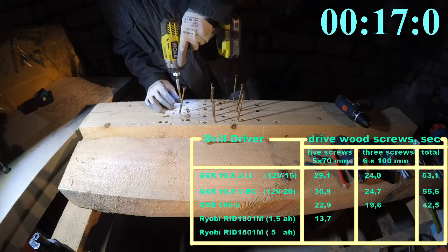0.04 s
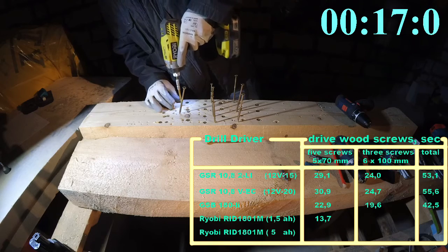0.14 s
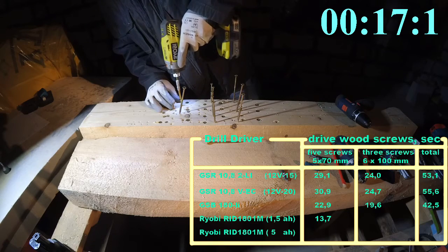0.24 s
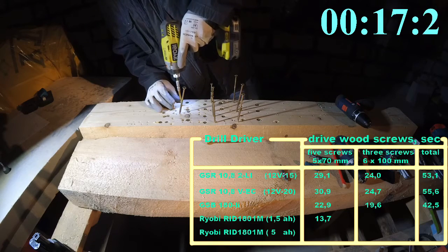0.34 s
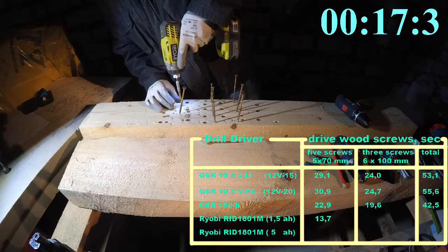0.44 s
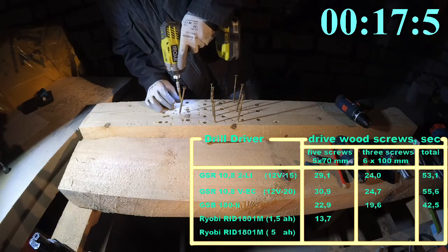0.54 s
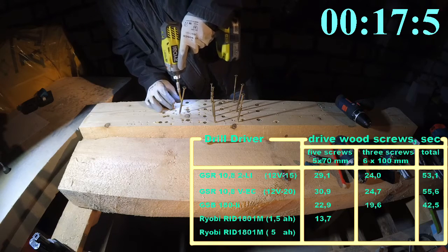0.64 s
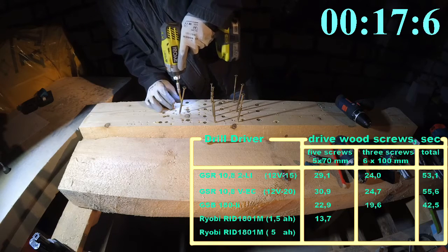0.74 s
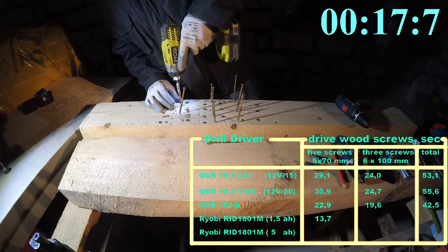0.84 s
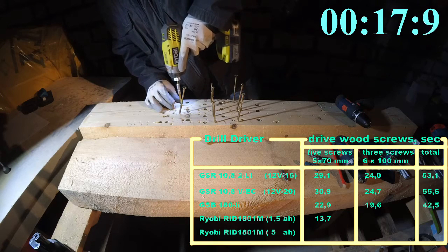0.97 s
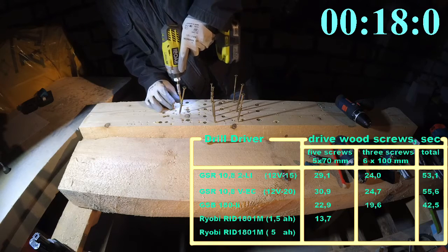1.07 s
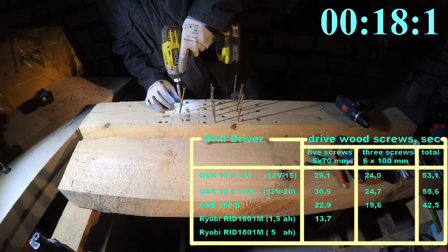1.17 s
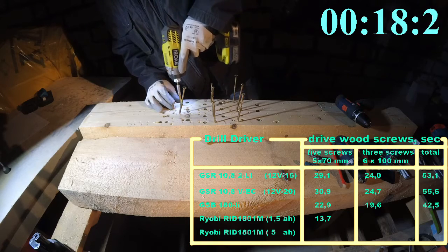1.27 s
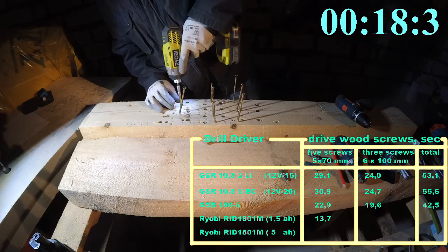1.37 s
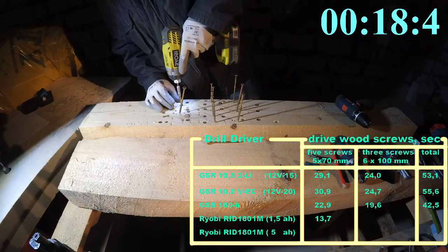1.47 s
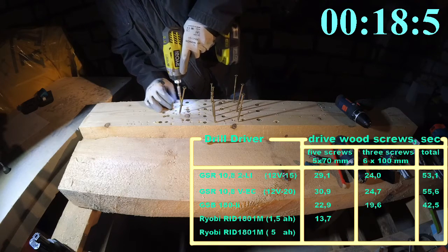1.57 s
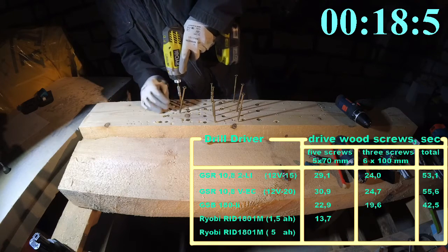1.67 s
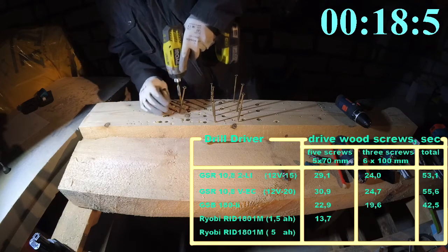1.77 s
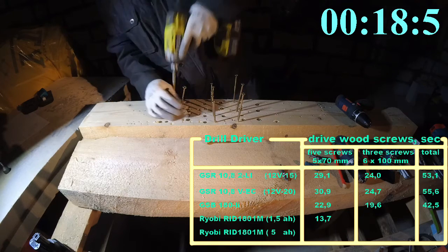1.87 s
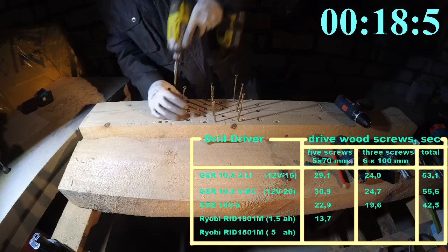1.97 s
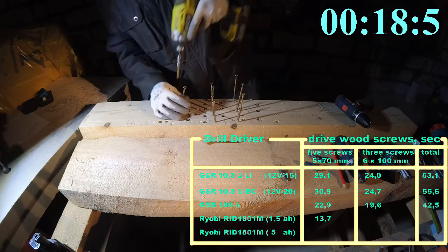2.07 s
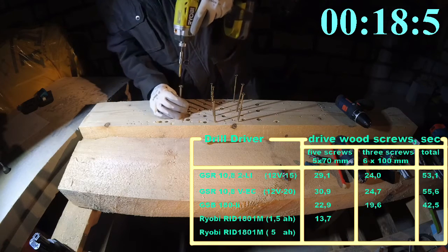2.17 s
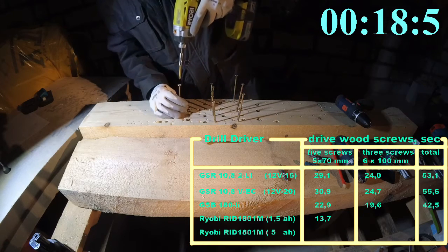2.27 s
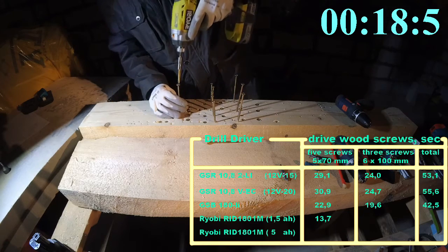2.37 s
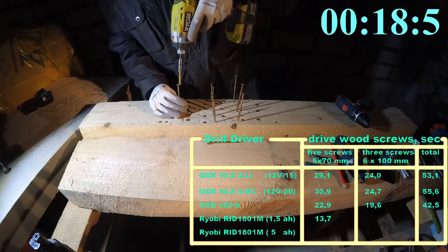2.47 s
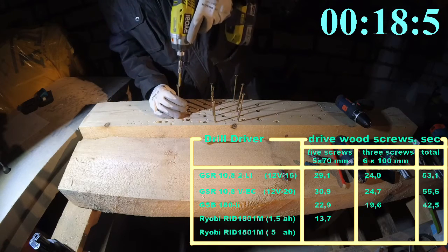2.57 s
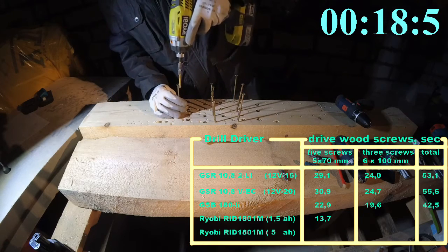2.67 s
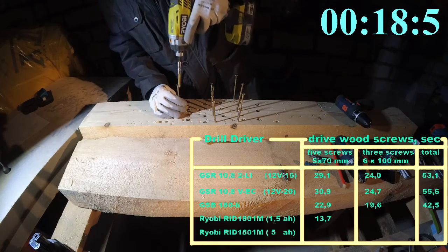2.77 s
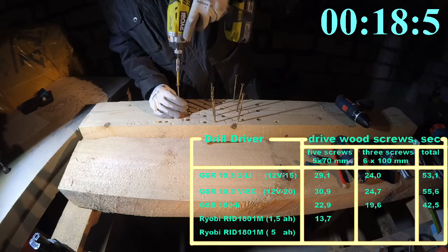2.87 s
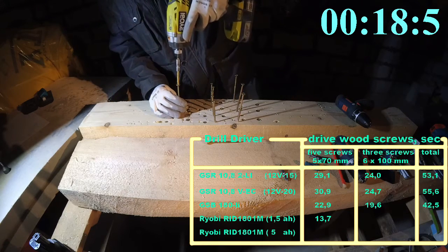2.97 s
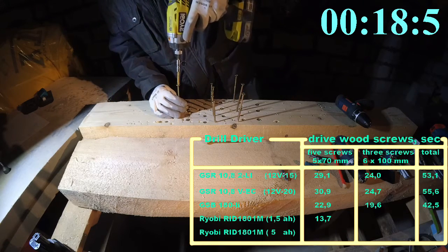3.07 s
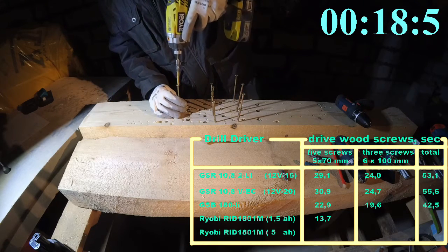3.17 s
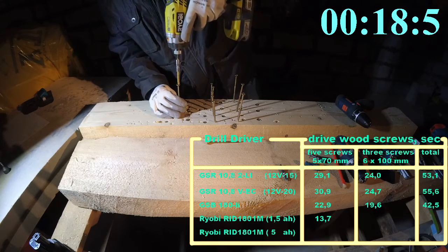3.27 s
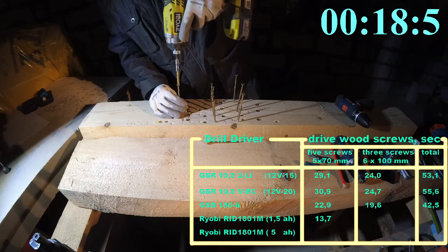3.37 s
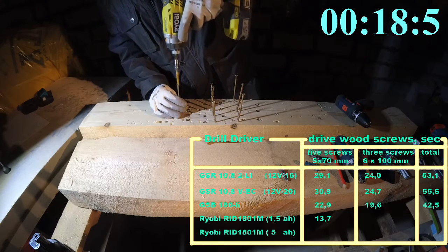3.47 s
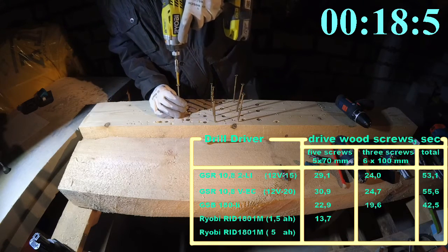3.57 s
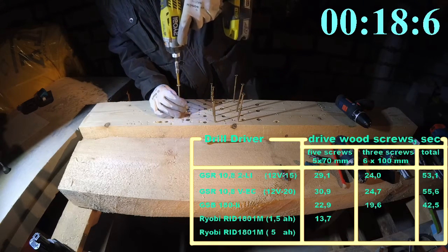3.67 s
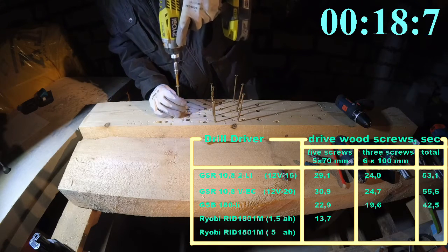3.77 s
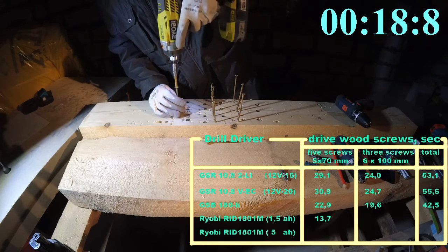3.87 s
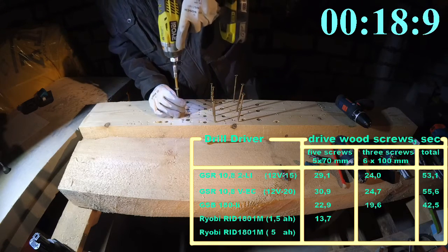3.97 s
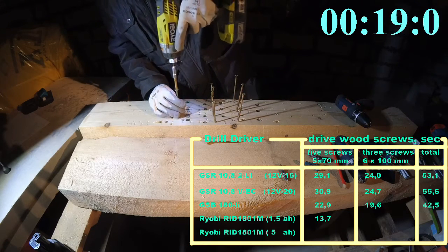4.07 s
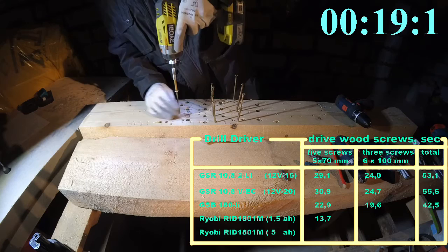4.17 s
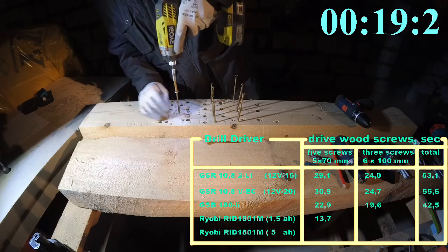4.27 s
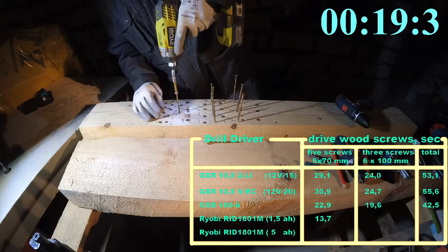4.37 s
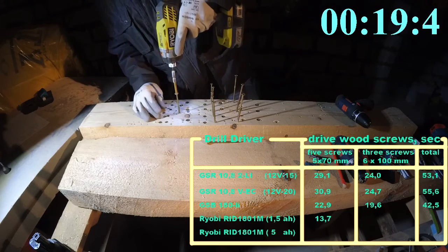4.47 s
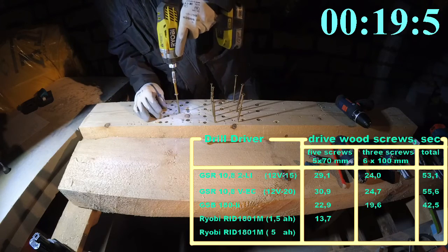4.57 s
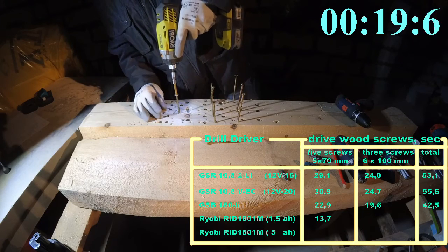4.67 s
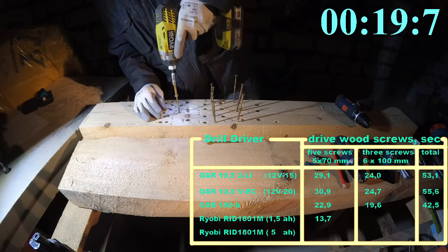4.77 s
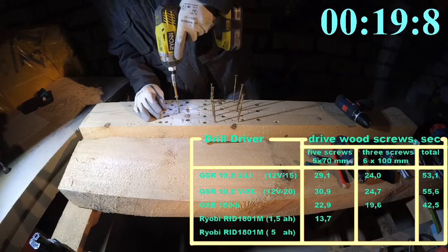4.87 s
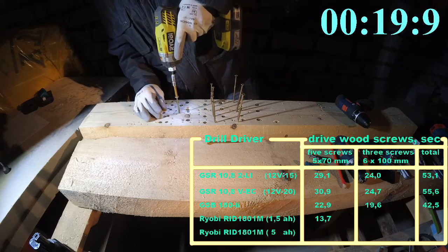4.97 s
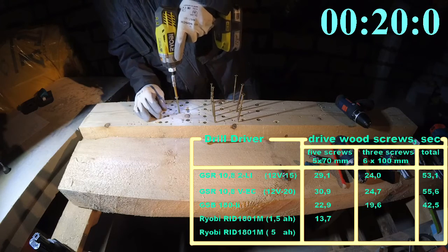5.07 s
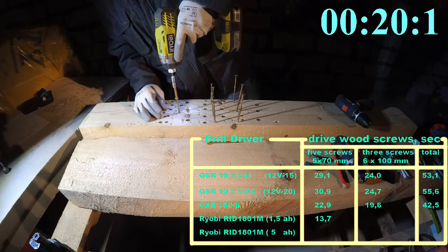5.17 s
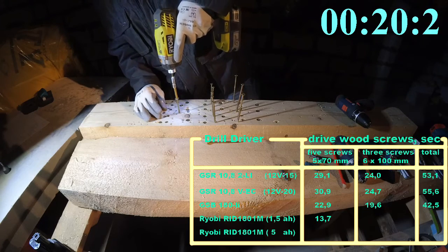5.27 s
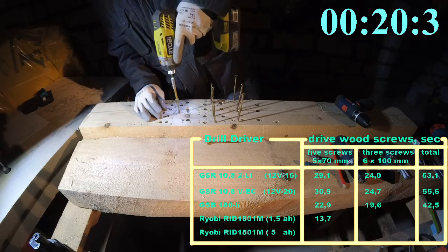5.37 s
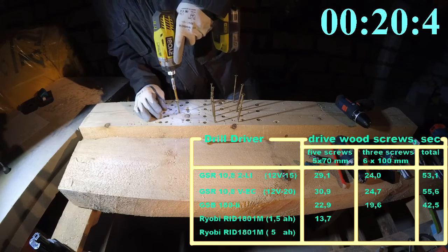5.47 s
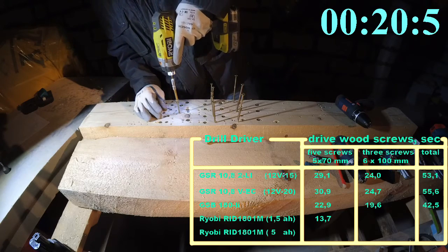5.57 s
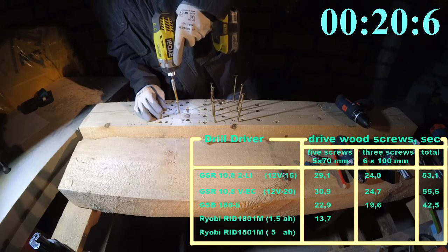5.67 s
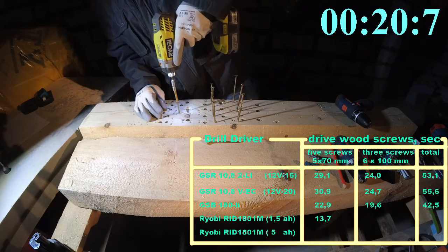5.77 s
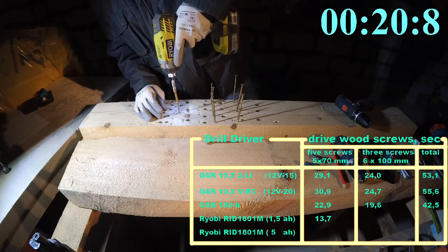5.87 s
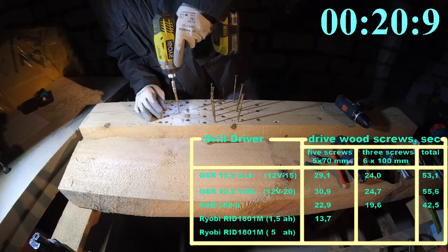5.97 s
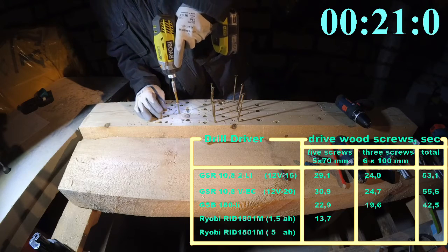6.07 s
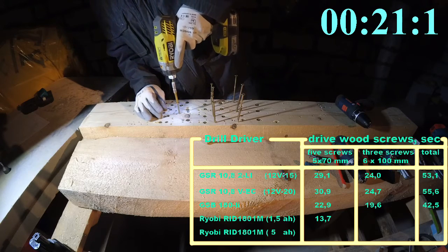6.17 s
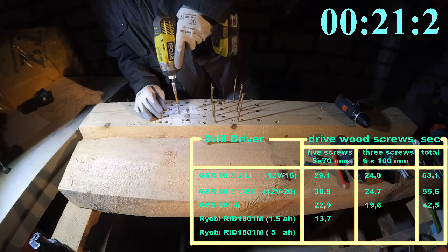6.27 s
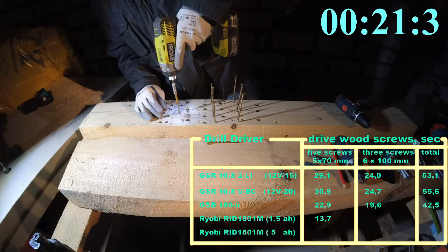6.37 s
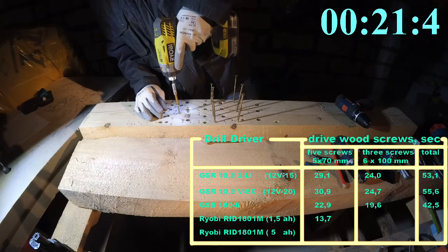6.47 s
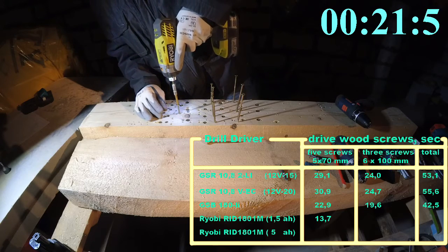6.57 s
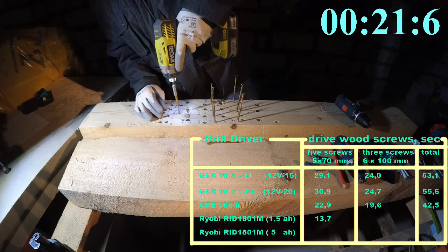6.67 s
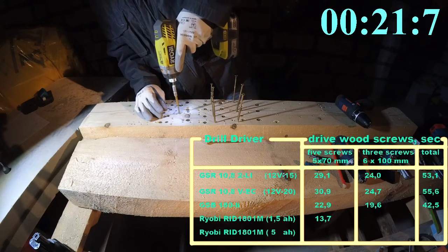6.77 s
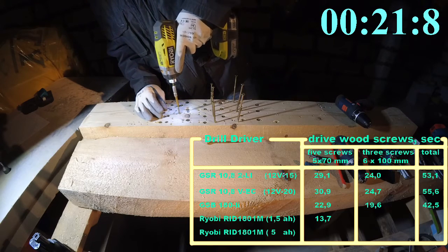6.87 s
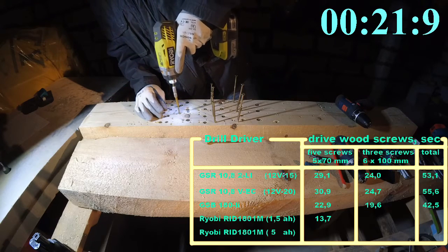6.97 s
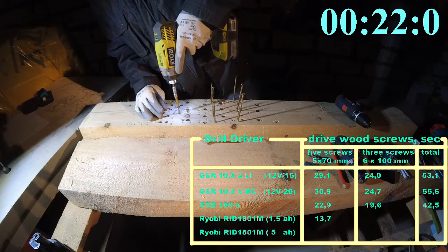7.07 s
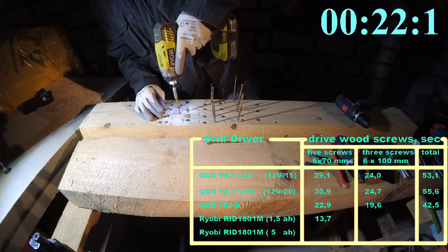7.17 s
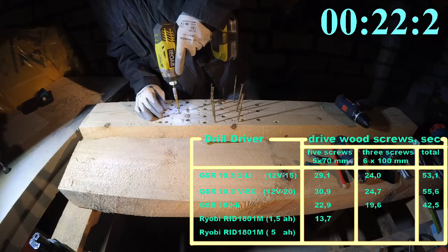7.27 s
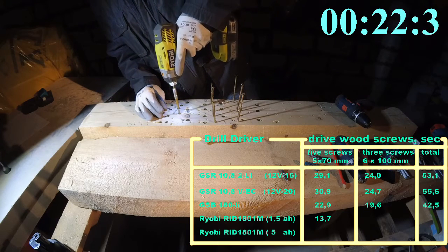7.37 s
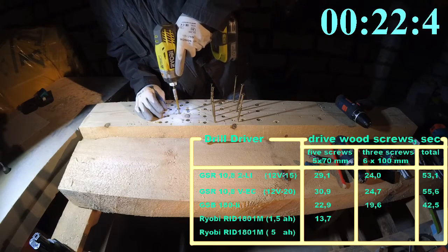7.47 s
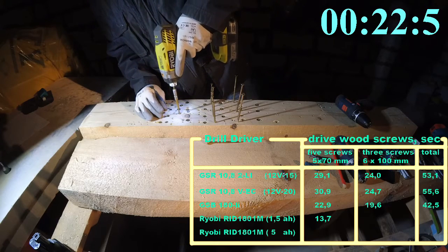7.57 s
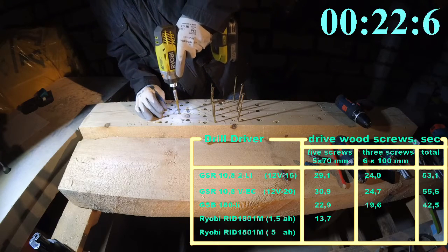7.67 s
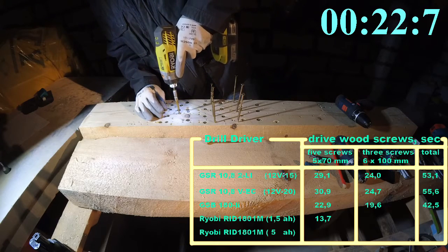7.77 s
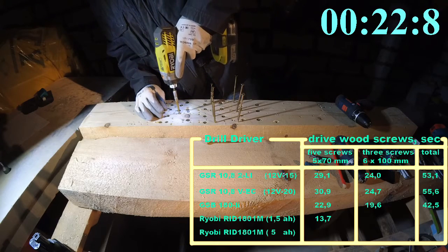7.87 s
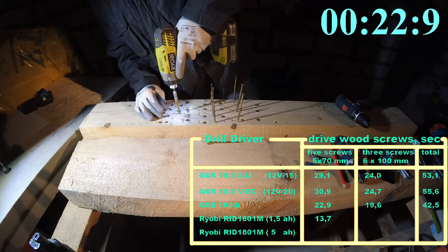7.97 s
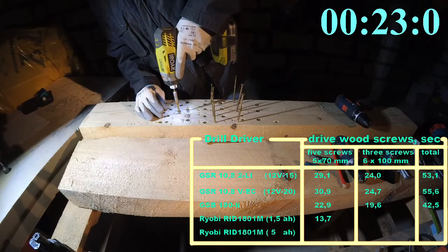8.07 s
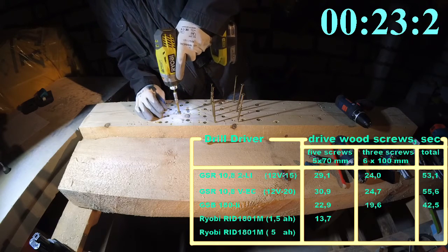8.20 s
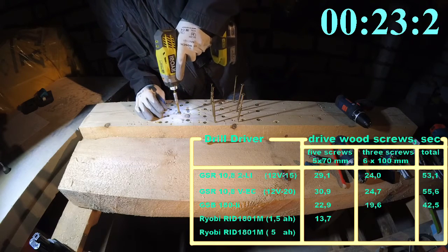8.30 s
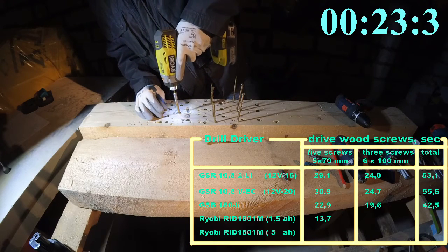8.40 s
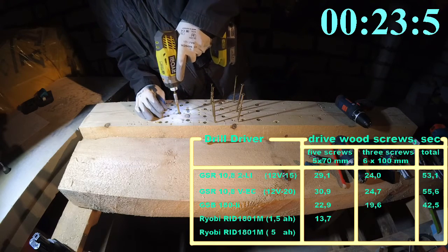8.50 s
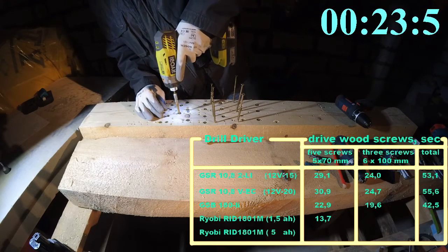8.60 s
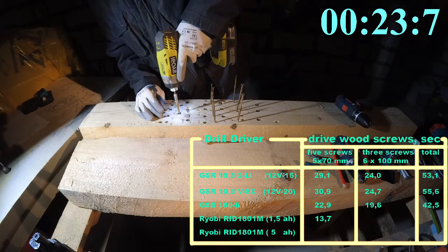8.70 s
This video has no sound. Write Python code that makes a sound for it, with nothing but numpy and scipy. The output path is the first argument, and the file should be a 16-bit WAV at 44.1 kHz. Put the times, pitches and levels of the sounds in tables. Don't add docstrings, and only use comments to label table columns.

```python
import sys
import numpy as np
from scipy import signal
from scipy.fft import rfft, irfft, next_fast_len
from scipy.io import wavfile

SR = 44100
rng = np.random.default_rng(int(sys.argv[2]) if len(sys.argv) > 2 else 0)


def gain_from_db(level_db):
    decades = np.asarray(level_db, float) / 20
    return 10 ** decades


def generate_wav(signal):
    frames = np.transpose(np.atleast_2d(signal))
    scaled = np.clip(frames, -1, 1) * 32767
    pcm = np.round(scaled).astype(np.int16)
    wavfile.write(sys.argv[1], SR, pcm)


N = 385434
T = np.arange(N) / SR


def unit(x):
    return x / np.sqrt(np.mean(x ** 2))


def noise():
    return rng.standard_normal(N)


def wobble(rate_hz):
    return unit(ring(noise(), rate_hz, 2 * rate_hz))


def curve(tables, column, quiet=-120):
    out = np.full(N, 1. * quiet)
    for rows in tables:
        rows = np.array(rows)
        inside = (T >= rows[0, 0]) & (T <= rows[-1, 0] + 1e-3)
        out[inside] = np.interp(T[inside], rows[:, 0], rows[:, column])
    return out


def colour(x, points):
    hz, db = np.transpose(points)
    size = next_fast_len(len(x))
    log_hz = np.log(np.arange(size // 2 + 1) * SR / size + 1)
    gain = gain_from_db(np.interp(log_hz, np.log(hz), db, left=-70))
    return irfft(rfft(x, size) * gain, size)[:len(x)]


def ring(x, hz, width_hz):
    return signal.lfilter(*signal.iirpeak(hz, hz / width_hz, SR), x)


def body(x, modes):
    return sum((-1) ** k * gain_from_db(db) * ring(x, hz, width) for k, (hz, width, db) in enumerate(modes))


def lift(x, modes):
    return x + sum(gain_from_db(db) * ring(x, hz, width) for hz, width, db in modes)


def tone(hz, db):
    return np.sqrt(2) * gain_from_db(db) * np.sin(2 * np.pi * np.cumsum(hz) / SR)


def spikes(s, size):
    return np.bincount(np.clip(s * SR, 0, N - 1).astype(int), size, N)


def burst(x, length_s):
    t = np.arange(int(6 * length_s * SR) + 2) / SR / length_s
    return signal.oaconvolve(x, t * np.exp(1 - t))[:N]


def crack_shape(x, length_s):
    t = np.arange(int(3 * length_s * SR) + 2) / SR / length_s
    return signal.oaconvolve(x, np.exp(-t ** 2))[:N]


# pitch_hz, level_db
HUM_COLOUR = [(65, -48), (110, 7.5), (192, 6.5), (358, -2), (553, -1), (909, -1), (1320, -4.5),
              (2260, -16.5), (3560, -25.5), (13100, -28), (14600, -36), (15500, -58)]
# start_s, end_s
PAUSE_S = (1.5, 3.8)


def shop():
    hum = unit(colour(noise() * gain_from_db(1.7 * wobble(5)), HUM_COLOUR)) * gain_from_db(-47)
    ramp_s = .15
    pause = np.clip(np.minimum(T - PAUSE_S[0], PAUSE_S[1] - T) / ramp_s, 0, 1)
    rumble = unit(ring(ring(noise(), 15, 36), 24, 74))
    return hum + rumble * gain_from_db(-41 + 5.5 * pause)


# pitch_hz, decay_s (time to fall 60 dB)
ROOM_DECAY = [(200, 0.69), (800, 0.78), (3000, 0.38), (9000, 0.18)]


def room(x):
    t = np.arange(SR) / SR
    tail = sum(ring(rng.standard_normal(SR), hz, 1.7 * hz) * 1000. ** (-t / t60) for hz, t60 in ROOM_DECAY)
    tail = tail * np.clip((t - .004) / .0021, 0, 1)
    return signal.oaconvolve(x, tail / np.sqrt(np.sum(tail ** 2)))[:N]


# start_s, held_s, level_db
SCRAPES = [(1.95, 0.43, -61), (2.505, 0.069, -51.5), (2.79, 0.067, -57), (2.995, 0.032, -48.5),
           (3.262, .02, -66), (3.312, 0.056, -49), (3.49, .04, -61), (3.538, 0.0063, -45.5),
           (3.594, .015, -50.5)]


def scraping():
    attack_s, fade_db_per_s = .006, 350
    level = 0
    for s, held, db in SCRAPES:
        fade_db = fade_db_per_s * np.clip(T - s - held, 0, 1)
        level = level + np.clip((T - s) / attack_s, 0, 1) * gain_from_db(db - fade_db)
    grains = noise() * gain_from_db(4 * wobble(120))
    return unit(ring(ring(grains, 3500, 4500), 3800, 7000)) * level


# start_s, peak_db, pitch_hz, knock_db (in the beam)
CLICKS = [(2.155, -42.5, 9040, -58), (2.208, -38, 11100, -52), (2.3494, -37.5, 2060, -54.5),
          (2.508, -27.5, 1970, -43), (2.5334, -21, 6130, -40), (2.5425, -21.5, 5800, -42.5),
          (2.5458, -18.5, 4020, -40), (2.803, -38.5, 1800, -51), (2.8345, -35, 2470, -52),
          (2.884, -40.5, 3070, -59.5), (2.993, -26.5, 3010, -45), (3.017, -27.5, 1890, -37),
          (3.312, -27.5, 2820, -50), (3.324, -28, 2210, -48), (3.332, -22, 2870, -40),
          (3.3557, -29, 1900, -42), (3.374, -25.5, 1890, -39), (3.495, -32.5, 2090, -55),
          (3.540, -19, 2190, -42), (3.5744, -41, 7700, -57), (3.62, -17.5, 5320, -41),
          (3.645, -23, 3830, -41.5), (3.666, -12.5, 5800, -37)]
# pitch_hz, width_hz, level_db
KNOCK_MODES = [(560, 110, -18), (844, 34, -2.5), (1290, 93, -11.5), (1900, 140, -9)]


def clicks():
    out, knock = np.zeros(N), np.zeros(N)
    t = np.arange(2048) / SR
    fade = np.exp(-t / .0022) * (1 + .82 * np.exp(-t / .00065))
    for s, db, hz, knock_db in CLICKS:
        puff = rng.standard_normal(len(t)) * fade
        click = .25 * ring(puff, 5200, 7500) + 1.3 * ring(puff, hz, .13 * hz)
        at = int(s * SR)
        out[at:at + len(t)] += gain_from_db(db) * click
        knock[at:at + len(t)] += gain_from_db(knock_db + 33) * puff
    return out + body(knock, KNOCK_MODES)


# start_s, level_db
SPIN = [(3.617, -64), (3.621, -37), (3.645, -32), (3.664, -25), (3.78, -26.5), (3.89, -31.5), (3.91, -22),
        (3.95, -40)]
# pitch_hz, level_db (per Hz)
SPIN_COLOUR = [(88, -46.5), (150, -6.5), (186, -23.5), (462, -28.5), (827, -13.5), (1170, -20.5),
               (2060, -14), (2270, -16.5), (2650, -15), (4560, -10.5), (15500, -20.5)]
# start_s, pitch_hz, level_db, octave_db
WHINE = [(3.74, 2216, -49, -39), (3.758, 2413, -36, -38), (3.77, 2451, -38.5, -46),
         (3.814, 2280, -36.5, -30.5), (3.85, 2180, -26, -31.5), (3.91, 2250, -40.5, -34)]
# start_s, pitch_hz, level_db
SWITCH = [(3.592, 7700, -68), (3.596, 7630, -58), (3.609, 7600, -53), (3.612, 7340, -43.5),
          (3.635, 7130, -52), (3.65, 7400, -68.5)]


def motor():
    teeth = colour(noise() * gain_from_db(2.2 * wobble(150)), SPIN_COLOUR)
    gear_modes = [(1340, 110, -2), (3680, 120, 0), (4080, 45, 2), (5120, 33, -1.5)]  # pitch_hz, width_hz, level_db
    hiss = unit(lift(teeth, gear_modes)) * gain_from_db(curve([SPIN], column=1))
    hz = curve([WHINE], column=1, quiet=1900) * (1 + .003 * wobble(50))
    whine = tone(hz, curve([WHINE], column=2) + 2 * wobble(40))
    octave = tone(2 * hz, curve([WHINE], column=3))
    switch_db = curve([SWITCH], column=2) + 2.5 * wobble(200)
    return hiss + whine + octave + tone(curve([SWITCH], column=1, quiet=7000), switch_db)


# start_s, pitch_hz, level_db
SQUEAL = [
    [(0, 4130, -33), (.8, 4105, -32), (1.62, 4150, -33)],
    [(3.9, 4300, -33), (3.925, 4290, -24), (3.97, 4580, -31), (4.14, 4360, -22), (4.6, 4120, -27),
     (4.7, 4110, -33), (4.9, 4115, -25), (6.3, 4100, -26), (8.74, 3990, -33)],
]
# start_s, end_s
CUTTING_S = (3.9, 4.65)


def squeal(blow_s):
    cutting = (T > CUTTING_S[0]) & (T < CUTTING_S[1])
    creep = burst(spikes(blow_s + .0085, np.ones(len(blow_s))), .0022) + .5 * cutting
    hz = curve(SQUEAL, column=1, quiet=4000) * (1 + .004 * wobble(60))
    level_db = curve(SQUEAL, column=2) - 2 * cutting + 1.6 * wobble(20)
    return unit(creep) * tone(hz, level_db)


FIRST_BLOW_S = (.002, 3.9125)
# blow_number, gap_ms (to the next blow)
PACE = [
    [(0, 19.901), (15, 19.765), (35, 19.885), (58, 19.723), (70, 19.116), (82, 18.345)],
    [(0, 27.722), (1, 30.677), (5, 21.684), (30, 20.053), (42, 20.653), (75, 19.984), (150, 19.775),
     (215, 19.407), (240, 18.095)],
]
# start_s, level_db
LAST_BLOWS = [(1.635, 2), (1.6636, 2), (1.7001, 5), (1.721, 4)]


def blow_times():
    steady = []
    for start, rows in zip(FIRST_BLOW_S, PACE):
        gaps = np.interp(np.arange(rows[-1][0]), *np.transpose(rows)) / 1000
        steady.append(start + np.append(0, np.cumsum(gaps)))
    last_s, last_db = np.transpose(LAST_BLOWS)
    s = np.concatenate([steady[0], last_s, steady[1]])
    return s, np.concatenate([0 * steady[0], last_db, 0 * steady[1]])


# delay_s, length_s, level_db, pitch_hz
RATTLE = [(.0056, .0012, -8, 4000), (.0082, .0022, -7, 4200), (.0111, .0019, 0, 3300),
          (.0152, .0012, -10, 4200)]


def rattle(blow_s, loose_db):
    out = 0
    for delay, length, db, hz in RATTLE:
        late, strong = rng.standard_normal((2, len(blow_s)))
        hits = spikes(blow_s + delay + .0005 * late, gain_from_db(loose_db + db + 1.8 * strong))
        out = out + ring(crack_shape(hits, length) * noise(), hz, 1.5 * hz)
    return unit(out)


def hammer():
    s, strength_db = blow_times()
    loose_db = -1300 * np.clip(np.diff(s, append=s[-1]) - .0208, 0, .012)
    late, strong = rng.standard_normal((2, len(s)))
    push = burst(spikes(s + .00012 * late, gain_from_db(1.5 * strong)), .00012)
    s = s + .00037 * late
    blows = spikes(s, gain_from_db(strength_db + 1.6 * strong))
    anvil = ring(crack_shape(blows, .0025) * noise(), 9000, 11000)
    delayed = np.roll(blows, int(.0014 * SR))
    shank = ring(crack_shape(delayed, .003) * noise(), 2200, 2600)
    crack = unit(anvil + gain_from_db(-4.5) * shank)
    whirr = gain_from_db(-.5) * noise()
    return crack + gain_from_db(-5.5) * rattle(s, loose_db) + whirr, push, s


# start_s, force_db (of the blows), grip_db (of the thread in the beam)
DRIVE = [
    [(0, -14, 7), (.25, -13.5, 3.5), (.6, -15, 5), (1.25, -14, 3), (1.5, -13, 4.5), (1.666, -11.5, 5.5),
     (1.72, -23, 12), (1.83, -41, 9)],
    [(3.9, -22.5, 10), (3.94, -17, -8.5), (4.11, -13.5, -2.5), (4.6, -12.5, 0), (5.9, -12.5, -2),
     (6.7, -13, 5), (7.6, -13.5, 6.5), (8.4, -13.5, 4.5), (8.74, -12.5, 5)],
]


def force_and_grip():
    return curve(DRIVE, column=1), curve(DRIVE, column=2, quiet=0)


# pitch_hz, width_hz, level_db
BEAM_RING = [(769, 12, -5.5), (894, 15, -2), (1079, 34, -9.5), (1110, 57, -7), (1323, 140, -5.5),
             (1546, 200, -16.5)]
# pitch_hz, width_hz
BEAM_NOTE = (836, 14)
# pitch_hz, width_hz, level_db
BEAM_THUD = [(52, 45, -13), (99, 10, -3), (156, 6, 3), (201, 10, -5), (258, 14, -4), (291, 6, 4),
             (327, 6, 2), (351, 13, 4.5), (385, 6, 2), (401, 8, 1), (466, 8, 4), (495, 12, -2),
             (560, 60, -6), (680, 60, -6)]
# pitch_hz, width_hz, level_db
FIRST_SEAT = [(453, 10, 9), (1310, 90, -1)]


def timber(rough, push):
    force_db, grip_db = force_and_grip()
    ringing = body((.21 * unit(push) + rough) * gain_from_db(force_db + .5 + 1.3 * grip_db), BEAM_RING)
    note = ring(rough * gain_from_db(force_db + 14 + .76 * grip_db), *BEAM_NOTE)
    grind = unit(ring(ring(rough, 400, 360), 280, 440))
    thud = unit(unit(body(push, BEAM_THUD)) + .65 * grind)
    thud = thud * gain_from_db(force_db - 16.5 + .15 * grip_db)
    beam = np.roll(ringing + note + thud, int(.0028 * SR))
    return np.where(T < PAUSE_S[1] - .5, lift(beam, FIRST_SEAT), beam)


# pitch_hz, level_db (per Hz)
CRACK_COLOUR = [(530, -10), (900, -6), (1540, -5), (1930, -3), (2360, -6), (2890, -4.5), (4600, -4.5),
                (7680, -3.5), (9800, -5.5), (12500, -12), (15500, -14.5)]
# pitch_hz, width_hz, level_db (against the broad crack)
STEEL_MODES = [
    [(2050, 300, -10), (2960, 120, -6), (3250, 220, -2), (3760, 260, 2), (4090, 180, 1), (4920, 200, -9),
     (7500, 400, -14)],
    [(1890, 90, -2), (1990, 70, -4), (2115, 60, -5), (2560, 150, -7), (2850, 110, -1), (2965, 70, -1),
     (3200, 260, -3), (3750, 250, -5), (4110, 200, -2), (5060, 140, -9), (6230, 150, -9), (7600, 300, -9)],
]


def steel(rough):
    broad = colour(rough, CRACK_COLOUR)
    first_screw = T < FIRST_BLOW_S[1] - .5
    ringing = np.where(first_screw, lift(broad, STEEL_MODES[0]), lift(broad, STEEL_MODES[1]))
    return unit(ringing) * gain_from_db(force_and_grip()[0])


def scene():
    rough, push, blow_s = hammer()
    beam = timber(rough, push)
    near = steel(rough) + squeal(blow_s) + motor() + clicks() + scraping()
    mix = gain_from_db(1.5) * near + beam + gain_from_db(-12.5) * room(near + .6 * beam) + shop()
    return np.tile(mix, (2, 1))


def band_limit(x):
    return signal.sosfilt(signal.butter(12, 15750, fs=SR, output="sos"), x)


# start_s, gain_db
CAMERA_GAIN = [(0, -16), (1.6, -16), (2.08, 0), (3.56, 0), (3.65, -8), (3.87, -16), (8.74, -16)]
OFFSET = [
    [.027],
    [-.037],
]


def record(dry):
    flutter = 1 + .035 * unit(ring(wobble(22), 25, 50))
    offset = np.array(OFFSET) * gain_from_db(curve([CAMERA_GAIN], column=1)) * flutter
    rail = .645
    flat = dry / (1 + (np.abs(dry) / rail) ** 6) ** (1 / 6)
    top_cut = signal.ellip(8, .2, 60, 15450, fs=SR, output="sos")
    flat = signal.sosfilt(top_cut, flat)
    return band_limit(flat + offset)


dry = scene()
out = record(dry)
generate_wav(out)
```